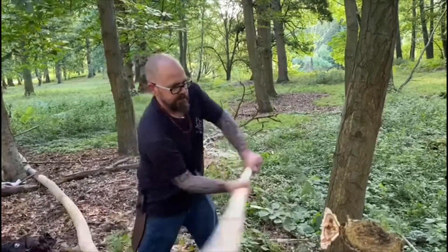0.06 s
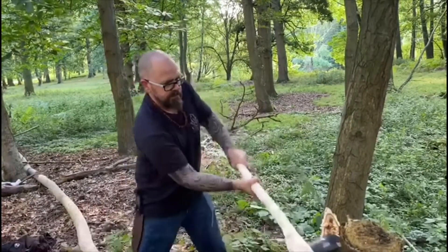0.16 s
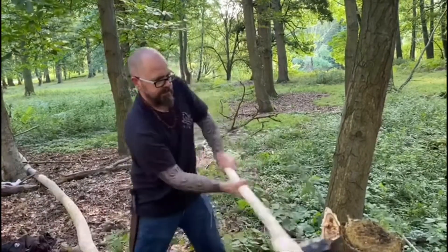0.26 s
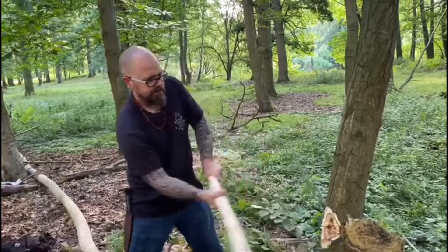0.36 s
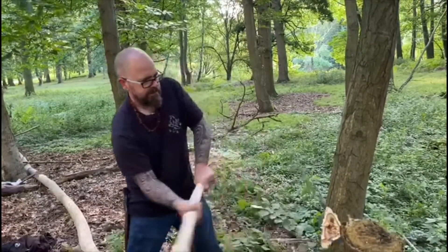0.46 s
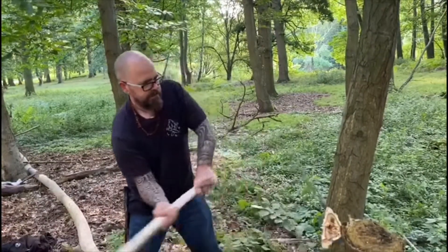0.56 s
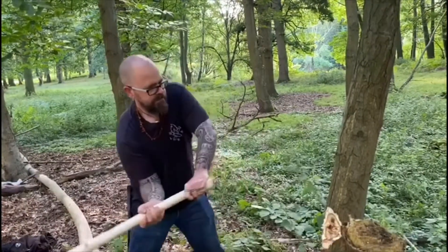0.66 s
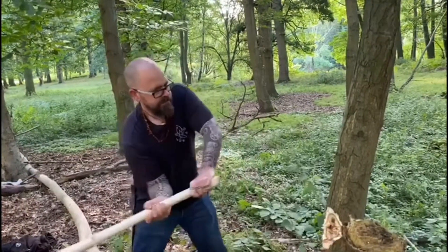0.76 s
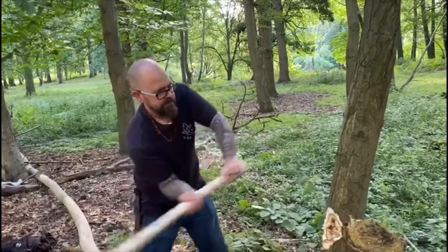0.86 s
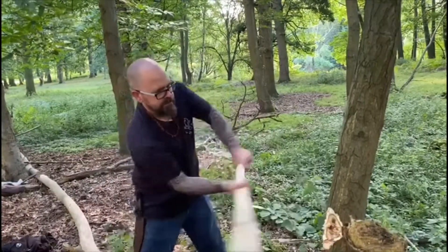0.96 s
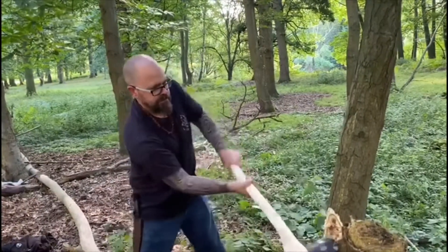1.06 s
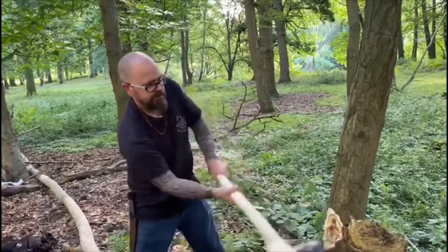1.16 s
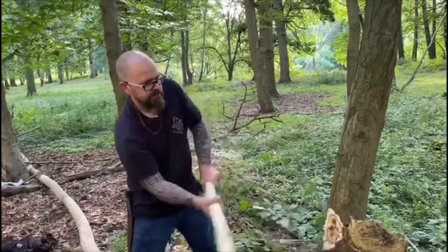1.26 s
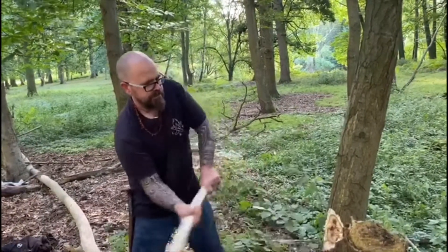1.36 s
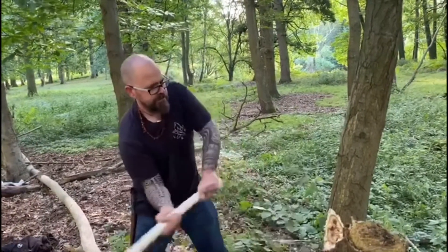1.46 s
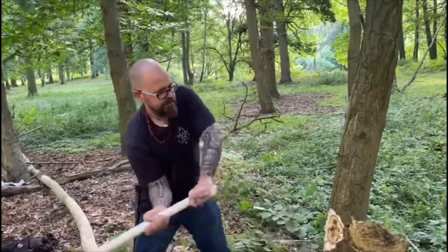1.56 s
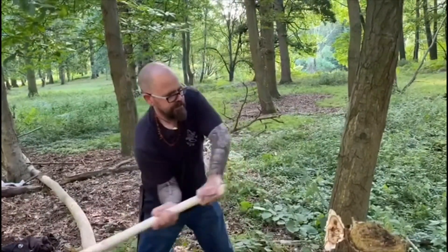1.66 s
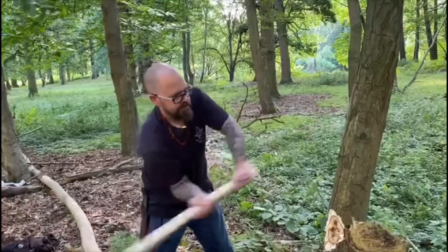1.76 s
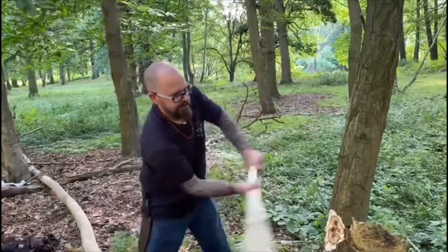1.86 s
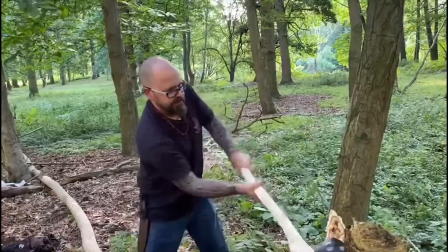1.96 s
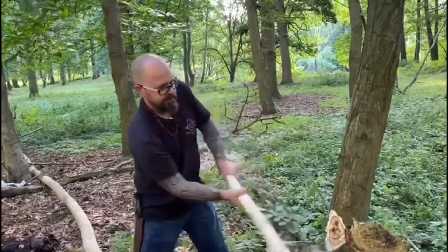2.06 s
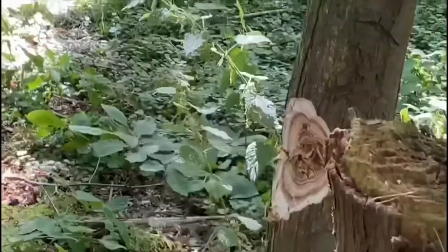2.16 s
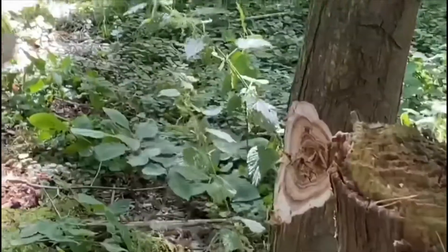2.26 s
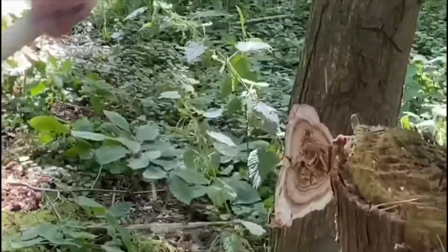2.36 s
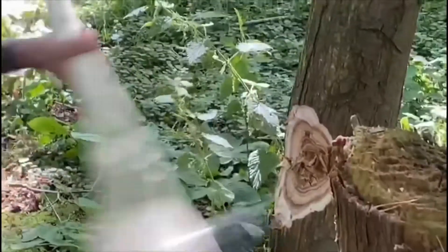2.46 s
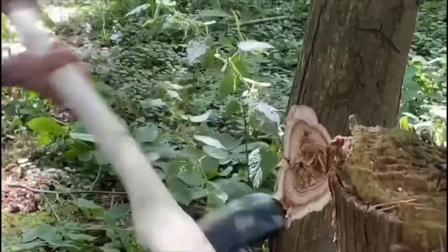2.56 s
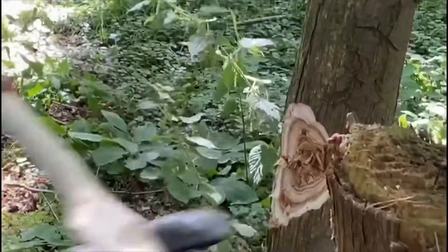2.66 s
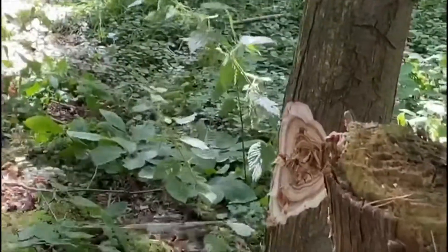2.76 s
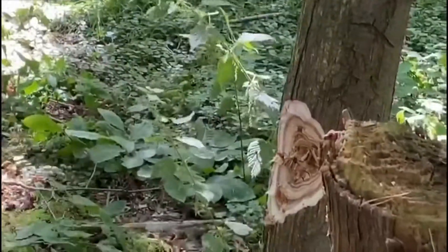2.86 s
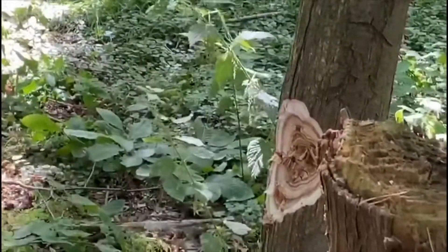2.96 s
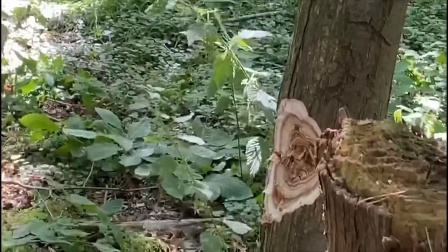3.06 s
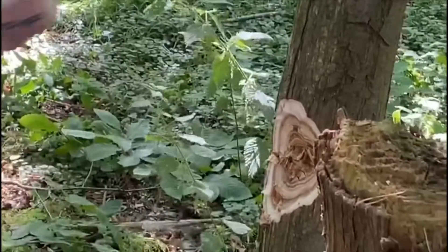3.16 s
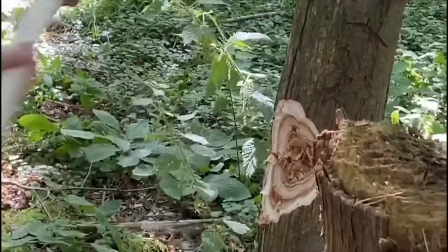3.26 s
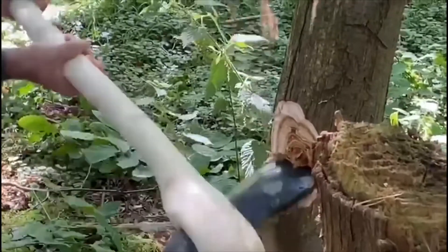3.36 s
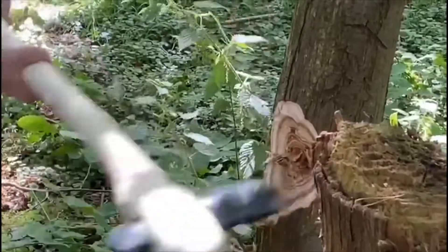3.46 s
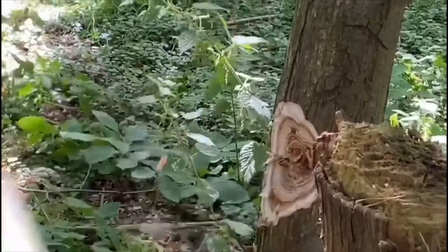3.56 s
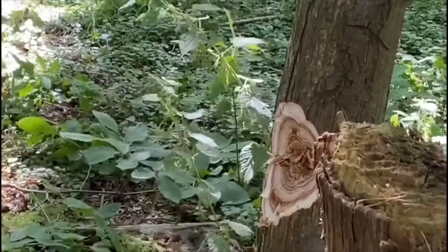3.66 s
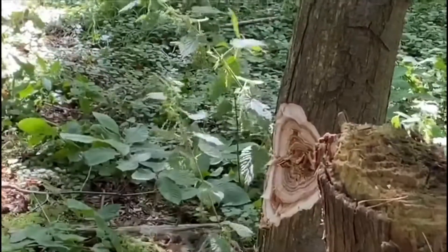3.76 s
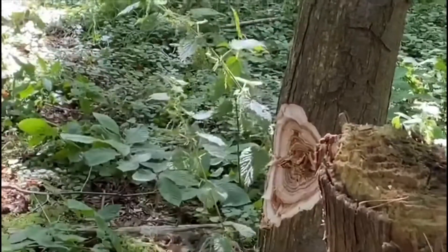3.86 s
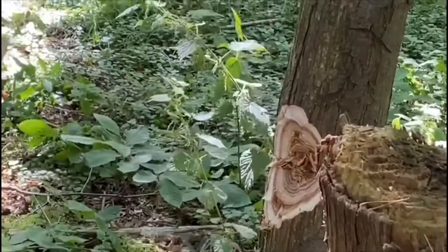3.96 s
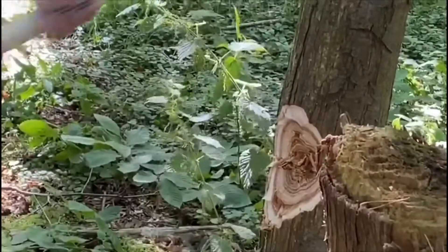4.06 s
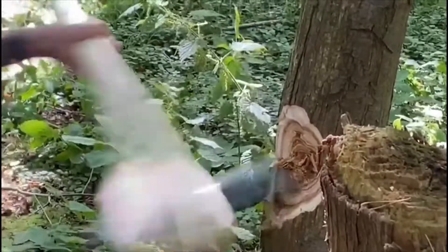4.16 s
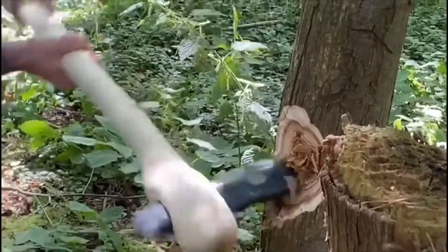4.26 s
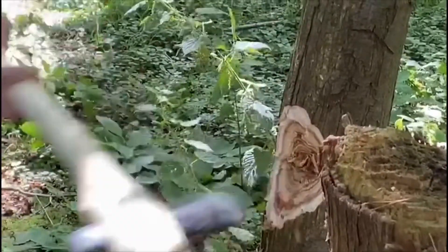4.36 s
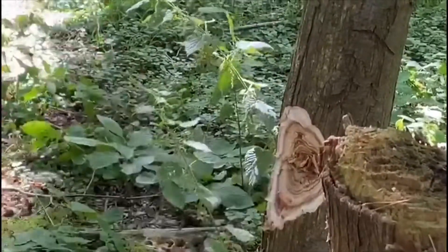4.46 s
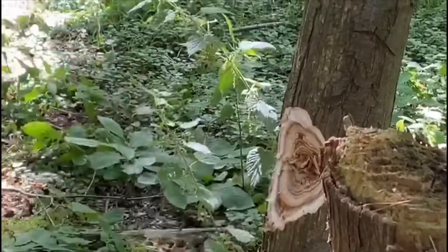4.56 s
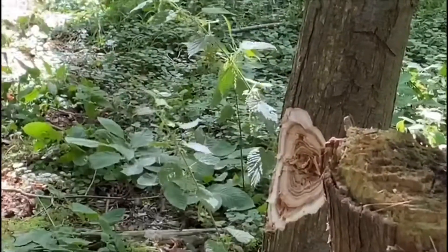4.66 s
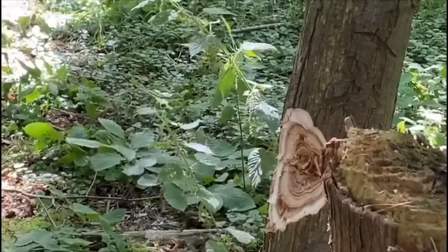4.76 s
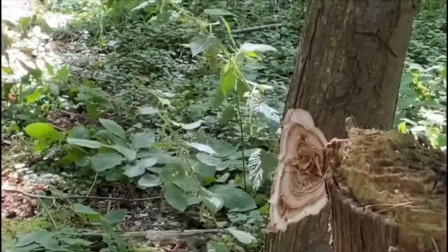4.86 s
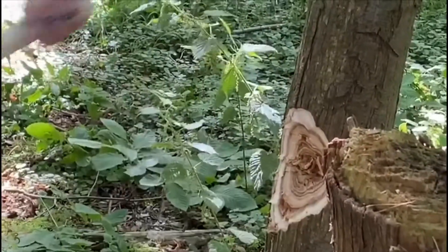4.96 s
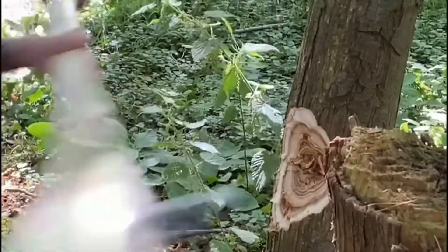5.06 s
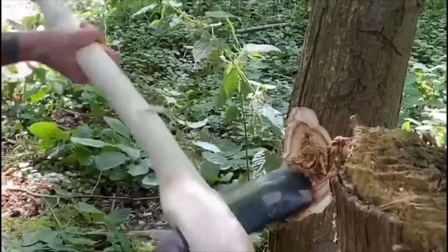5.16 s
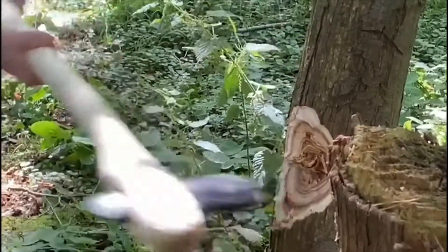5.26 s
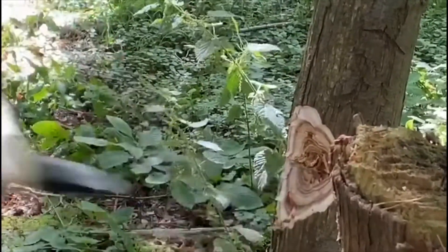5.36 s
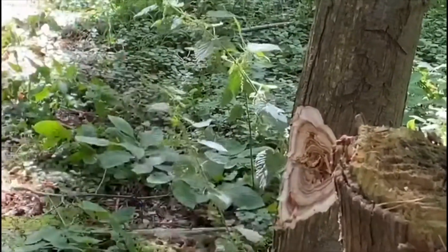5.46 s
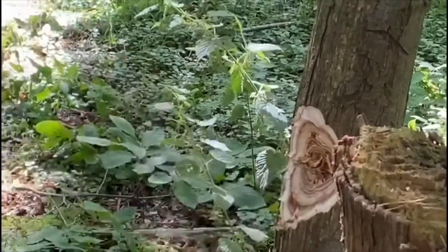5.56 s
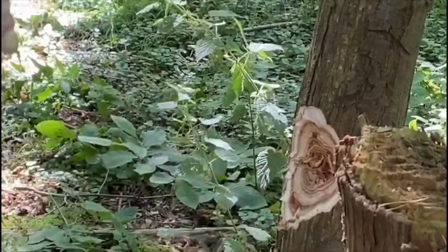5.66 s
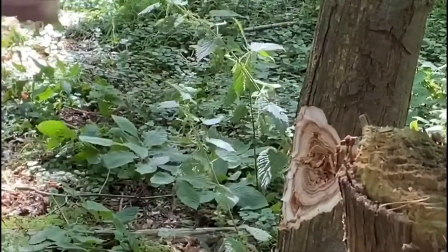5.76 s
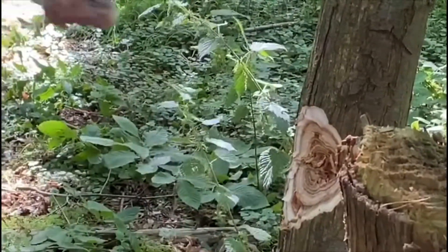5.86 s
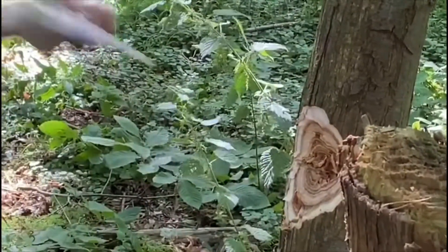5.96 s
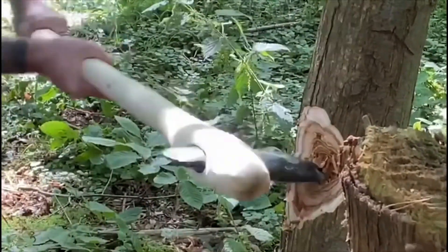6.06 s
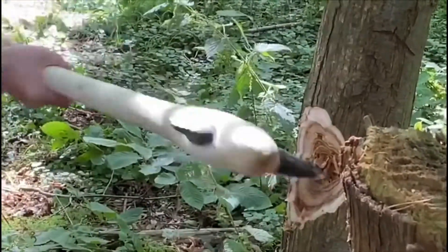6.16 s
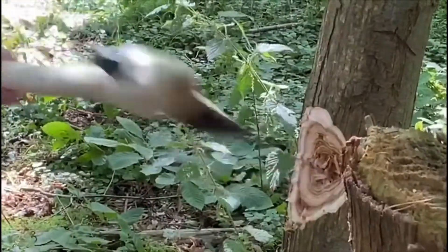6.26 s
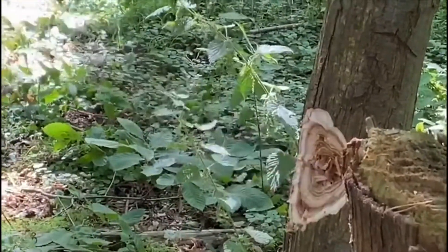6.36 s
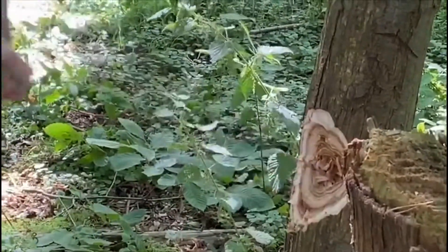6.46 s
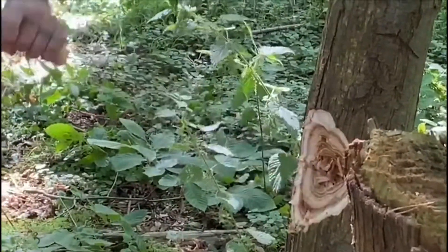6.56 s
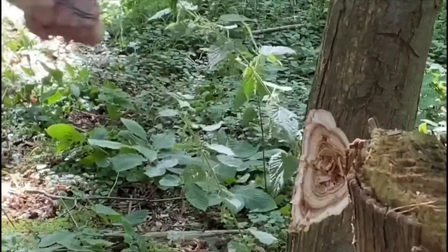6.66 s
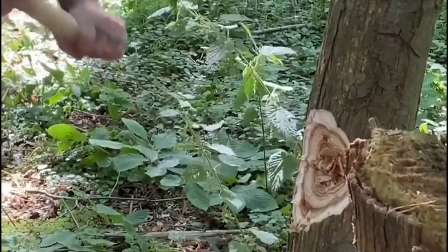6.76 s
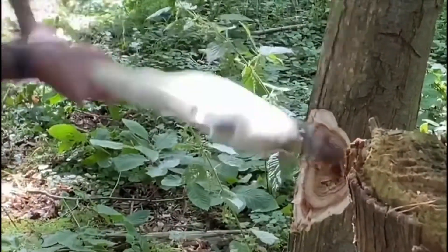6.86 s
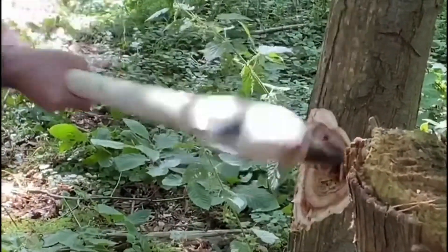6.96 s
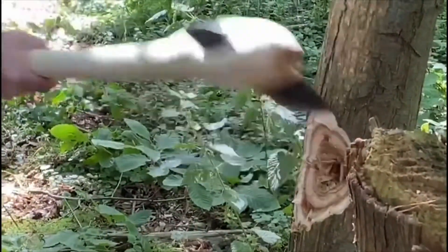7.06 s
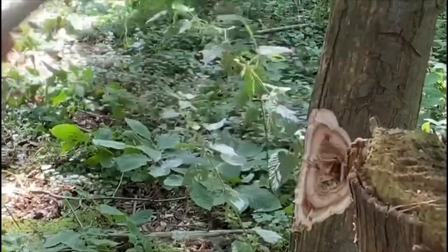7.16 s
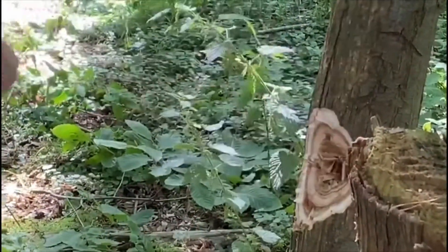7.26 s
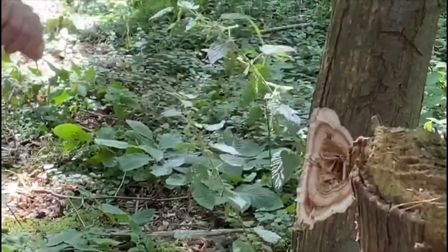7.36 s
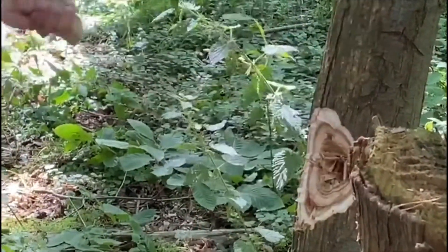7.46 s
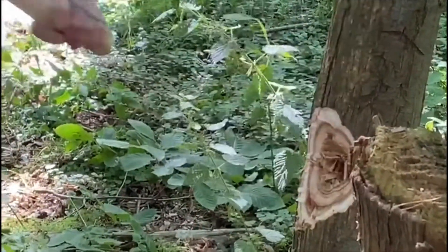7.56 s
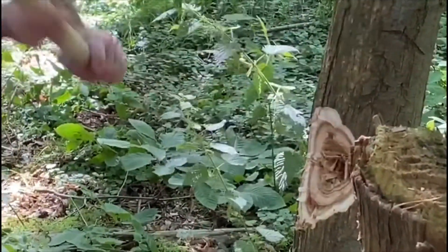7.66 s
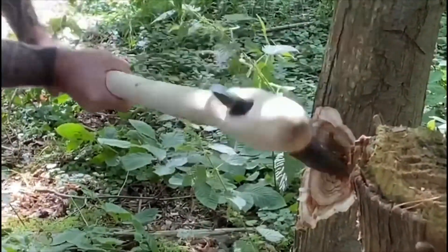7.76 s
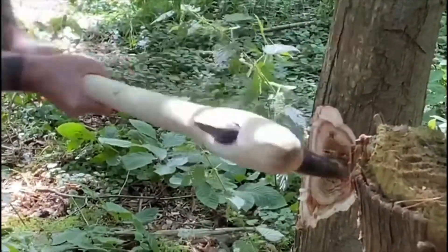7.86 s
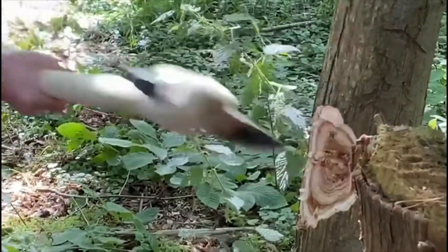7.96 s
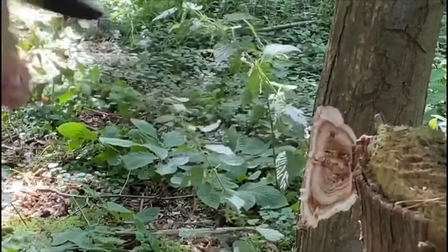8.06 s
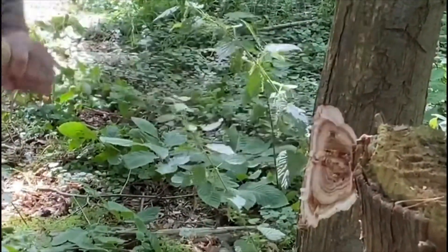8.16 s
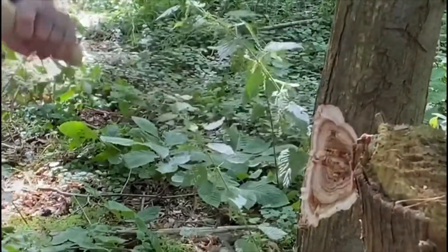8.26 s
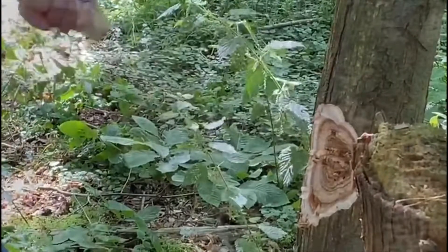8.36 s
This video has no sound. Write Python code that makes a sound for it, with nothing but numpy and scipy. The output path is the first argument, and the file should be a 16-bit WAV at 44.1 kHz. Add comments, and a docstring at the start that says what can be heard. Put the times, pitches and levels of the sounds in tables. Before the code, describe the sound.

A stone axe chops ten times into a standing trunk in a wood, each hard woody knock dying quickly, with faint birds early on.

```python
"""In a wood, close by, a stone axe chops ten times into a standing trunk.
Each blow crushes fibres (noisy snaps), rings the cut and the stem (fading tones) and shakes the tree (low tones).
Noise that fades band by band makes the undergrowth's quick echo and the long soft one from the trees around.
Chips tick and the axe is worked loose (short crackles), weight shifts with soft thumps (low tones),
small birds call at first (gliding tones), and the air hums steadily (dark noise)."""
import sys
import numpy as np
from scipy import signal
from scipy.fft import rfft, irfft
from scipy.io import wavfile
from scipy.ndimage import uniform_filter1d

SR = 44100
rng = np.random.default_rng(int(sys.argv[2]) if len(sys.argv) > 2 else 0)


def store_pcm(level_fs):
    """Save levels as 16-bit WAV."""
    pcm = np.round(np.clip(level_fs, -1, 1) * 32767).astype(np.int16)
    wavfile.write(sys.argv[1], SR, np.atleast_2d(pcm).T)


N = 370440
TIME = np.arange(-(SR // 10), N) / SR   # seconds, with a short run-in before time 0
AGE = np.arange(SR) / SR   # the second that follows a contact

# Far hum of the air: pitch_hz, level_db
AIR_COLOUR = [(15, -31), (25, -4), (74, -1), (208, -14.5), (700, -18), (7540, -41.5), (8580, -59.5),
              (10800, -35.5), (12000, -51), (15600, -79), (22000, -120)]
# How alike the air is left and right: pitch_hz, likeness (1 = the same)
AIR_LIKENESS = [(60, 1), (270, 0.77), (600, 0.95), (1200, 0.07), (2600, 1), (12000, 0.93)]
AIR_DB = -60
# Quick scatter from the ground and undergrowth: pitch_hz, level_db, fade_by_60_db_s, left_right_likeness
UNDERGROWTH = [(65, -11.5, 0.74, .85), (135, -13.5, 0.7, 0.7), (280, -20, 0.16, -0.11),
               (596, -14.5, 0.22, 0.32), (1200, -9, 0.11, -0.43), (2410, -17, 0.14, 0.97),
               (5000, -18, 0.21, 1), (11000, -16.5, 0.093, 1)]
# Long scatter from the trunks around: pitch_hz, level_db, fade_by_60_db_s, left_right_likeness
TRUNKS = [(140, 11, 1.2, 1), (300, 8.5, 1.1, 0.56), (600, 5.5, 1.3, 0), (1360, 8, 1.1, 0.018),
          (2410, 4.5, 0.87, 1), (5000, 4.5, 1.2, 1), (8000, 1, 1.3, 1), (12000, 1, 1, 1)]
GAP_S = 2.015   # the level dips briefly here and the echo stops

# Thin bird whistles, before the leaves blur them: start_s, length_s, pitch_hz, scoop_depth_hz, level_db
WHISTLES = [(0.496, 0.15, 6950, 716, -60), (.735, 0.057, 5200, 40, -56), (0.85, .045, 5300, 40, -53),
            (1.706, .07, 6660, 420, -53)]
WHISTLE_FADE_S, SCOOP_AT_S, SCOOP_WIDTH_S = .02, .034, .021   # each note dips soon after its start
TRILL_START_S, TRILL_STEP_S = 1.226, .078
TRILL_DB = -56.5   # before the leaves blur it

# Soft thumps of shifting weight: time_s, peak_db
THUMPS = [(2.139, -42), (3.458, -33), (3.7, -44.5), (8.29, -43)]
# The larger chips falling and the edge scraping free: start_s, level_db, pitch_hz
CHIPS = [(1.1523, -34.5, 1653), (1.522, -51, 3950), (2.036, -53, 4500), (2.149, -49, 1800),
         (3.505, -44, 3117), (3.526, -28, 2158), (3.765, -47, 2199), (4.142, -41.5, 5000),
         (5.307, -51.5, 2946), (6.234, -51.5, 2900), (7.786, -49, 5980)]
# Tone colour of a chip's crackle: pitch_hz, level_db
CHIP_COLOUR = [(300, -12.5), (900, 7.5), (2200, 0), (5000, -4.5), (7500, 1.5), (11000, -13), (13000, -7.5)]
CHIP_S, CHIP_ECHO_DB = 0.0032, -29   # time scale of a chip's crackle; its share in the far echo
CRUMBS_PER_S, CRUMB_DB, CRUMB_HZ = 2.5, -62.5, 3300   # tiny bits dropping into the leaves at random
CRUMB_SPREAD_DB, CRUMB_SPREAD_OCTAVES = -1, .4   # furthest from the middle level and pitch

# Axe blows; the first lands just before time 0: start_s, force_db, bite_depth (0-1), knock_pitch_hz,
# crack_db, splinter_db, stone_pitch_hz, stone_echo_db (beside the snap)
BLOWS = [(-.014, -1.5, 0.49, 757, -27.5, -28, 3960, -12), (0.8714, -1.5, 0.3, 826, -27.5, -27, 3490, -9.5),
         (1.77, -3.5, 0.1, 900, -29.5, -40, 4450, 2.5), (2.3675, 0.05, .23, 1013, -27.5, -29.5, 2967, -7.5),
         (3.2109, 0.5, 0.31, 954, -26, -37.5, 3090, -15),
         (4.0669, 0.5, 0.79, 1070, -27, -31.5, 3130, -14.5),
         (4.9505, 0.8, 0.36, 999, -26, -31.5, 3387, -14), (5.8727, 0.56, 0.8, 870, -29, -32.5, 3116, -12.5),
         (6.7327, -1, 0.49, 973, -24, -30.5, 4620, 1.5),
         (7.607, -0.06, 0.75, 1220, -26.5, -28.5, 3425, -7.5)]
# Bending of the whole rooted tree: pitch_hz, relative_level_db, fade_by_60_db_s
SWAY = [(45.8, -11, 0.71), (68.2, 2.5, 0.37), (78.3, -7.5, .5), (87.3, 0, .19), (127.9, 3, 0.16),
        (145.6, 2, 0.15)]
# Ringing across the stem: pitch_hz, relative_level_db, fade_by_60_db_s
STEM = [(185, -6.5, 0.17), (225, -10, 0.14), (280.5, -4.5, 0.14), (350, -3.5, .07), (367.5, -1, .1),
        (417.4, -4, 0.092), (460, -1.5, 0.047), (546, -5, 0.046), (609.4, -4, .08), (664, -1, .07),
        (712, -8, 0.09), (814, -15, .12)]
# Wood around the cut: multiple_of_knock_pitch, relative_level_db, fade_by_60_db_s
CUT = [(.84, -1, 0.018), (1, 6, 0.017), (1.11, -6, 0.034), (1.378, -6.5, 0.039), (1.65, -7.5, 0.042),
       (1.898, -15, 0.04), (2.2, -15, 0.032)]
# Colour of crushed fibres: pitch_hz, relative_level_db
CRACK = [(900, -25), (2050, -3.5), (2550, -2), (3200, 2.5), (4500, 1), (6000, -3.5), (8000, -16.5)]
# Colour of splintering fibres: pitch_hz, relative_level_db
SPLINTER = [(3500, -27.5), (6000, -0.5), (7400, 1.5), (9000, -7), (11000, -1.5), (12500, -15)]
# Colour of a chip splitting off: pitch_hz, relative_level_db
SPLIT = [(700, -20), (1200, -1.5), (1550, 0.5), (2050, -1.5), (2600, -12.5), (4000, -31.5)]
# The clap that the bark throws outwards: multiple_of_its_centre, relative_level_db
CLAP = [(.1, -9.5), (.35, -6.5), (0.698, 1), (0.999, -0.5), (1.399, -2.5), (1.999, -7.5), (3.198, -14),
        (7, -28)]
# The snap that goes out with the clap: pitch_hz, relative_level_db
SNAP = [(700, -10), (1900, 3.5), (2600, -1), (3400, -3.5), (5000, -3), (7500, -4), (11000, -12),
        (12500, -17)]

# A deep bite drives the stem and the whole tree, a shallow one knocks on the surface:
# level of each part for a bite of depth 0 at force 0 dB, and what depth 1 adds
THUD_DB, THUD_DEPTH_DB = -21.5, 3
STEM_DB, STEM_DEPTH_DB = -25, 12
KNOCK_DB, KNOCK_DEPTH_DB = -17.5, -9
SPLIT_DB, SPLIT_DEPTH_DB = -27, -5.5
CLAP_DB, CLAP_DEPTH_DB = -49, 0.5
# A deep bite also sounds lower: centre at depth 0, octaves added at depth 1
STEM_HZ, STEM_DEPTH_OCTAVES = 550, -0.12
CLAP_HZ, CLAP_DEPTH_OCTAVES = 1290, -1.1
SNAP_DB, KNOCK_ECHO_DB = -56.5, -58   # treble snap and ring of the cut, as thrown out into the wood

# Left-right balance of the whole sound: pitch_hz, left_minus_right_db
BALANCE = [(300, -0.5), (600, -1), (1100, -2.5), (2000, -0.5), (3500, 0.54), (12000, 0)]
CUTOFF_HZ = 12300


def from_db(db):
    """Turn decibels into a plain gain."""
    return 10 ** (np.asarray(db) / 20)


def at_hz(points, hz):
    """Read a table between its rows, with pitch spaced by octaves."""
    points = np.array(points)
    return np.interp(np.log(np.maximum(hz, 1)), np.log(points[:, 0]), points[:, 1])


def bins(x):
    """Frequencies of the spectrum of x."""
    return np.fft.rfftfreq(x.shape[-1], 1 / SR)


def colour(x, spectrum):
    """Filter to the given spectrum without sounding early (minimum phase)."""
    size = x.shape[-1]
    cepstrum = irfft(np.log(from_db(at_hz(spectrum, bins(x)))), size)
    # folding the second half onto the first leaves no sound before the hit
    cepstrum[1:size // 2] *= 2
    cepstrum[size // 2 + 1:] = 0
    return irfft(rfft(x) * np.exp(rfft(cepstrum)), size)


def resonate(x, hz, q):
    """One resonance, gain 1 on top; a higher q rings longer."""
    peak = signal.iirpeak(min(hz, SR / 3), max(q, .7), fs=SR)
    return signal.lfilter(*peak, x)


def at_level(x, db):
    """Set the average (rms) level of the first 40 ms."""
    return x * from_db(db) / np.sqrt(np.mean(x[:SR // 25] ** 2) + 1e-20)


def add(track, s, sound):
    """Mix a sound in at time s."""
    start = np.searchsorted(TIME, s)
    part = sound[:len(track) - start]
    track[start:start + len(part)] += part


def dying(t60):
    """A fade that loses 60 dB in t60 seconds."""
    return from_db(-60 * AGE / max(t60, 1e-4))


def swell(rise_s):
    """A smooth rise from silence."""
    return 1 - np.exp(-(AGE / rise_s) ** 2)


def stereo_noise(likeness, size):
    """Two white noises, alike by frequency as the table says."""
    mid, side = rfft(rng.standard_normal((2, size)))
    alike = np.clip(at_hz(likeness, np.fft.rfftfreq(size, 1 / SR)), -1, 1)
    shared = np.sqrt((1 + alike) / 2) * mid
    opposed = np.sqrt((1 - alike) / 2) * side * [[1], [-1]]
    return irfft(shared + opposed, size)


def air():
    """A steady, dark outdoor floor of coloured noise."""
    noise = colour(stereo_noise(AIR_LIKENESS, len(TIME)), AIR_COLOUR)
    return from_db(AIR_DB) * noise / noise.std()


def forest_echo(bands, rise_s, patchy_db):
    """Countless small reflections build up and die away, each band at its own rate."""
    size = 2 * SR
    age, centres = np.arange(size) / SR, np.array(bands)[:, 0]
    # the echo is uneven, stronger at some moments than at others
    uneven = np.interp(age, np.linspace(0, 2, 130), rng.standard_normal(130))
    patches = from_db(patchy_db * uneven)
    rise = 1 - np.exp(-(age / rise_s) ** 2)
    noise = stereo_noise([(hz, likeness) for hz, db, t60, likeness in bands], size)
    out = 0
    for hz, db, t60, likeness in bands:
        # each band takes over smoothly from its neighbours
        share = at_hz(np.column_stack([centres, centres == hz]), bins(noise))
        band = irfft(rfft(noise) * share, size)
        shape = from_db(-60 * age / t60) * rise * patches
        out = out + band * from_db(db) * shape / np.linalg.norm(shape)
    return out


def echoed(x, echo):
    """Spread a sound through the wood; the echo of what came before the gap ends there."""
    early = TIME < GAP_S
    out = 0
    for part in (early, ~early):
        spread = signal.fftconvolve((x * part)[None], echo, axes=1)[:, :len(x)]
        out = out + spread * part
    return out


def whistle(length_s, hz, scoop_hz, db):
    """A thin wavering note that scoops down and comes back to its pitch."""
    waver = uniform_filter1d(rng.standard_normal(SR), size=100)
    scoop = scoop_hz * np.exp(-((AGE - SCOOP_AT_S) / SCOOP_WIDTH_S) ** 2)
    pitch = (hz - scoop) * (1 + 0.13 * waver)
    loud = np.clip(np.minimum(AGE, length_s - AGE) / WHISTLE_FADE_S, 0, 1)
    return from_db(db) * loud * np.sin(2 * np.pi * np.cumsum(pitch) / SR)


def trill(count):
    """A row of rising notes, made husky by slow noise that shakes their loudness."""
    out = np.zeros(len(TIME))
    along = np.clip(AGE / 0.045, 0, 1)   # each note lasts 45 ms
    for k in range(count):
        hz = (3500 + 1700 * along) * (1 + 0.029 * rng.standard_normal())
        husk = signal.lfilter(*signal.butter(2, 260, fs=SR), rng.standard_normal(SR))
        tone = np.sin(2 * np.pi * np.cumsum(hz) / SR)
        slur = np.sin(np.pi * along) * husk / husk.std() * tone
        add(out, TRILL_START_S + k * TRILL_STEP_S, from_db(TRILL_DB) * slur)
    return out


def birds():
    """Whistles and a trill, blurred by the leaves, which scatter them as fading noise."""
    out = trill(count=7)
    for s, *note in WHISTLES:
        add(out, s, whistle(*note))
    leaves = rng.standard_normal(SR) * dying(.55)
    blurred = signal.fftconvolve(out, leaves / np.linalg.norm(leaves))[:len(out)]
    return .5 * out + .65 * blurred


def thump(peak_db):
    """A soft push on the ground: a low tone that swells and dies."""
    sound = swell(0.0094) * dying(0.104) * np.sin(2 * np.pi * 66 * AGE)
    return from_db(peak_db) * sound / np.abs(sound).max()


def fibres(t60, grain_db, per_s):
    """A dying run of tiny snaps of uneven size, as wood fibres give way at random."""
    snaps = (rng.random(SR) < per_s / SR) * rng.choice([-1, 1], SR)
    sizes = from_db(grain_db * np.minimum(rng.exponential(1, SR), 3))
    return snaps * sizes * dying(t60)


def crumbs():
    """Faint ticks at random moments, as rows: start_s, level_db, pitch_hz."""
    rows = []
    for when, size, pitch in rng.random((int(CRUMBS_PER_S * N / SR), 3)):
        db = CRUMB_DB + CRUMB_SPREAD_DB * (2 * size - 1)
        hz = CRUMB_HZ * 2 ** (CRUMB_SPREAD_OCTAVES * (2 * pitch - 1))
        rows.append((when * N / SR, db, hz))
    return rows


def chip(db, hz, length_s):
    """A short crackle with the dull ring of a small piece of wood."""
    crackle = colour(fibres(length_s * 6.5, 3.2, 9000) * swell(length_s / 5), CHIP_COLOUR)
    sound = crackle + 1.9 * resonate(crackle, hz, q=3.8)
    return from_db(db) * sound * np.sqrt(length_s * SR) / np.linalg.norm(sound)


def struck(modes, scatter_db, detune, lag_s, looseness):
    """Damped tones set off together; strengths, pitches and phases differ a little each time."""
    chance = rng.standard_normal((len(modes), 3))
    age = AGE - lag_s
    out = 0
    for (hz, db, t60), (strength, pitch, phase) in zip(modes, chance):
        turns = hz * (1 + detune * pitch) * age + looseness * phase
        out = out + from_db(db + scatter_db * strength) * dying(t60) * np.cos(2 * np.pi * turns)
    return out


def sway(lag_s, rise_s):
    """The heavy tree takes a moment to get moving, the same way on every blow."""
    age = AGE - lag_s   # where the waves of all its tones line up
    tones = sum(from_db(db) * dying(t60) * np.cos(2 * np.pi * hz * age) for hz, db, t60 in SWAY)
    return swell(rise_s) * tones


def stem_ring(centre_hz):
    """The place of the cut favours some stem tones; the head shoves once more as it comes to rest."""
    modes = [(hz, db - 5 * np.log2(hz / centre_hz) ** 2, t60) for hz, db, t60 in STEM]
    first = struck(modes, scatter_db=3.5, detune=0.0097, lag_s=.004, looseness=0.17) * swell(0.0039)
    second = struck(modes, scatter_db=3.0, detune=0.0034, lag_s=.004, looseness=0.28) * swell(0.0067)
    return first + 0.18 * np.interp(AGE - .015, AGE, second, left=0)   # second shove 15 ms later


def crushing(stone_hz, crack_db):
    """Fibres crush under the edge, and their snaps ring the stone."""
    # the first bite is loudest, then the fibres give way more slowly
    bite = fibres(0.054, 3.0, 12000) * (1 + 2.0 * dying(0.0023)) + 0.099 * fibres(0.081, 3.0, 7600)
    tear = at_level(colour(bite, CRACK), 0)
    stone = at_level(resonate(bite, stone_hz, q=7.5), -1.2)
    return at_level((tear + stone) * swell(0.00045), crack_db)


def splintering(splinter_db):
    """Fibres tear in a bright burst with a faint longer tail."""
    shreds = fibres(0.033, 0.87, 9000) * (1 + dying(0.005)) + 0.099 * fibres(0.13, 3.7, 8600)
    return at_level(colour(shreds, SPLINTER) * swell(0.00026), splinter_db)


def cut_knock(knock_hz, depth):
    """The wood around the cut rings as a few short tones."""
    cut = [(knock_hz * k, db, t60) for k, db, t60 in CUT]
    knock = struck(cut, scatter_db=5.5, detune=0.023, lag_s=.002, looseness=0.28) * swell(0.0015)
    return at_level(knock, KNOCK_DB + KNOCK_DEPTH_DB * depth)


def thrown_out(force, depth, knock_hz, stone_hz, ring_db):
    """From afar the blow is one short pulse, coloured by the bark, the cut and the stone."""
    pulse = signal.unit_impulse(SR)
    clap_hz = CLAP_HZ * 2 ** (CLAP_DEPTH_OCTAVES * depth)
    clap_colour = [(clap_hz * k, db) for k, db in CLAP]
    clap = at_level(colour(pulse, clap_colour), CLAP_DB + CLAP_DEPTH_DB * depth)
    clap += at_level(resonate(pulse, knock_hz * 1.03, q=4.6), KNOCK_ECHO_DB)
    snap = at_level(colour(pulse, SNAP), 0) + at_level(resonate(pulse, stone_hz, q=10.0), ring_db)
    return force * clap + from_db(SNAP_DB) * snap


def blow(force_db, depth, knock_hz, crack_db, splinter_db, stone_hz, ring_db):
    """The edge bites first; knock, stem and tree follow. Returns the close and the outgoing sound."""
    depth, force = np.clip(depth, 0, 1), from_db(force_db)
    crack = crushing(stone_hz, crack_db)
    splinter = splintering(splinter_db)
    split = colour(fibres(.04, 2.7, 9000) * swell(0.0017), SPLIT)
    split = at_level(split, SPLIT_DB + SPLIT_DEPTH_DB * depth)
    knock = cut_knock(knock_hz, depth)
    stem = stem_ring(STEM_HZ * 2 ** (STEM_DEPTH_OCTAVES * depth))
    stem = at_level(stem, STEM_DB + STEM_DEPTH_DB * depth)
    thud = at_level(sway(lag_s=.0165, rise_s=0.016), THUD_DB + THUD_DEPTH_DB * depth)
    close = crack + splinter + force * (split + knock + stem + thud)
    return close, thrown_out(force, depth, knock_hz, stone_hz, ring_db)


def scene():
    """Blows, chips and thumps close by, their echoes, the birds and the air."""
    background = birds() + air()
    undergrowth = forest_echo(UNDERGROWTH, rise_s=0.007, patchy_db=3.5)
    trunks = forest_echo(TRUNKS, rise_s=0.044, patchy_db=2.6)
    close, thrown = np.zeros((2, len(TIME)))
    for s, peak_db in THUMPS:
        add(close, s - .008, thump(peak_db))   # starts early, as it swells slowly
    for s, db, hz in CHIPS + crumbs():
        sound = chip(db, hz, CHIP_S)
        add(close, s, sound)
        add(thrown, s, sound * from_db(CHIP_ECHO_DB))
    for s, *stroke in BLOWS:
        near, outward = blow(*stroke)
        add(close, s, near)
        add(thrown, s, outward)
    wet = echoed(close, undergrowth) + echoed(thrown, trunks)
    dip = 1 - .9 * np.exp(-((TIME - GAP_S) / .015) ** 4)
    return ((close + wet + background) * dip)[:, -N:]


def record(dry):
    """The mids lean right, a port turns the left phase near 9 kHz, peaks are rounded, the top is cut."""
    lean = from_db(at_hz(BALANCE, bins(dry)) / 2 * np.array([[1], [-1]]))
    left, right = irfft(rfft(dry) * lean, N)
    # an all-pass filter: it turns the phase and leaves the level alone
    port = signal.iirnotch(8950, 5.0, fs=SR)[1]
    ports = np.array([signal.lfilter(port[::-1], port, left), right])
    top = .95   # loudest value the rounding lets through
    rounded = ports / (1 + (ports / top) ** 4) ** .25
    treble_cut = signal.ellip(10, .3, 80, CUTOFF_HZ, fs=SR, output="sos")
    return signal.sosfilt(treble_cut, rounded)


dry = scene()
out = record(dry)
store_pcm(out)
```